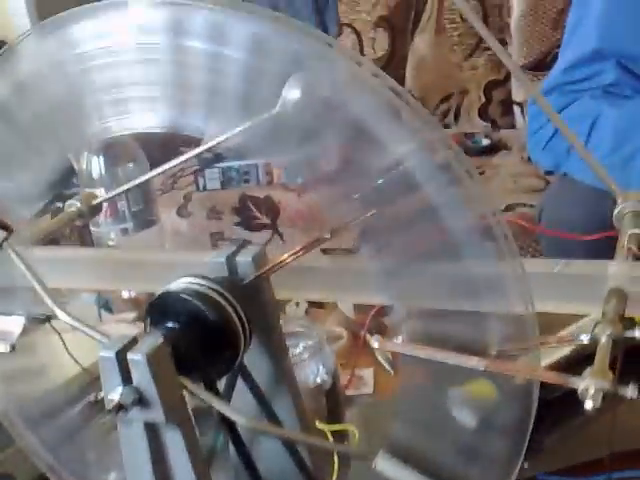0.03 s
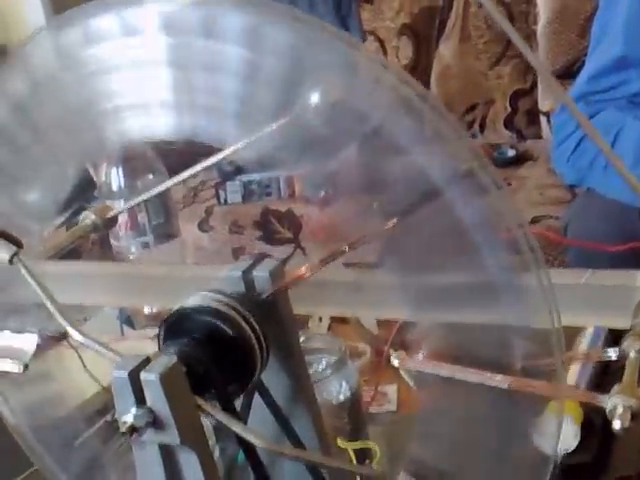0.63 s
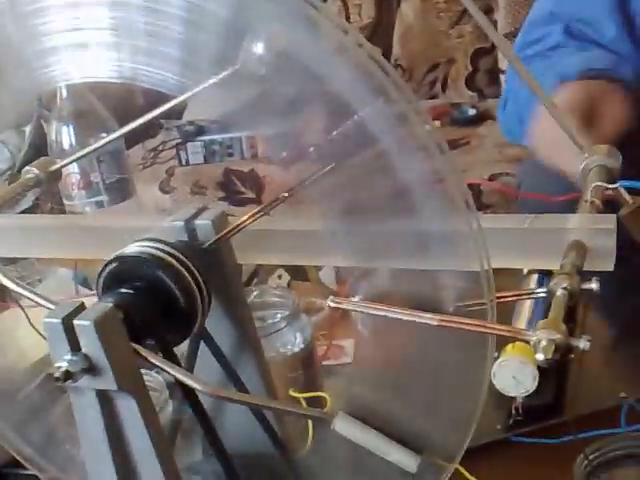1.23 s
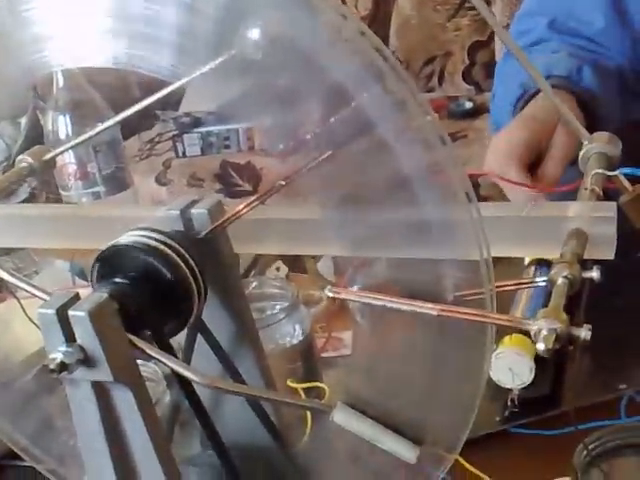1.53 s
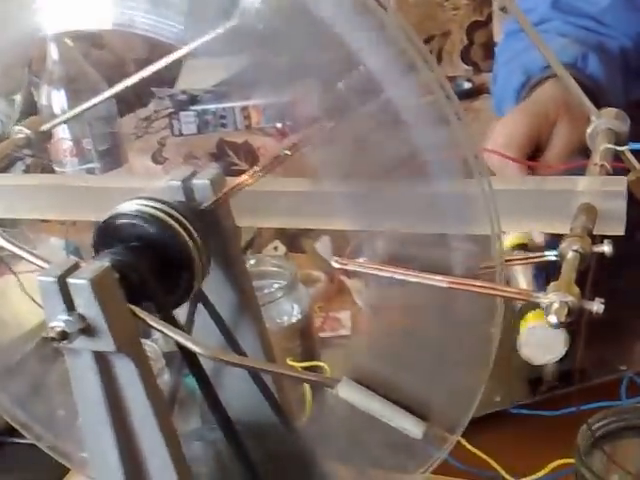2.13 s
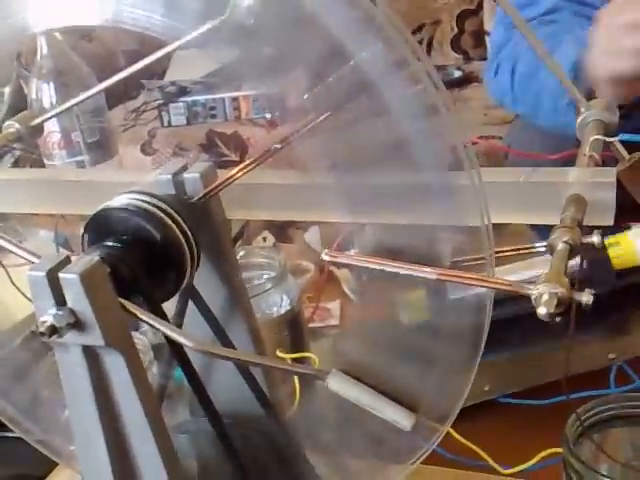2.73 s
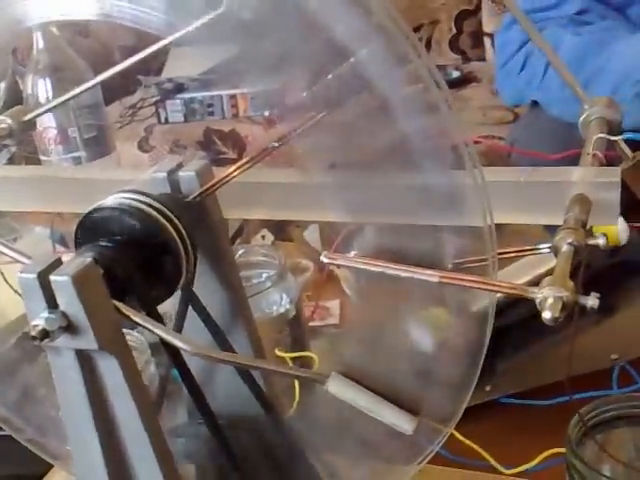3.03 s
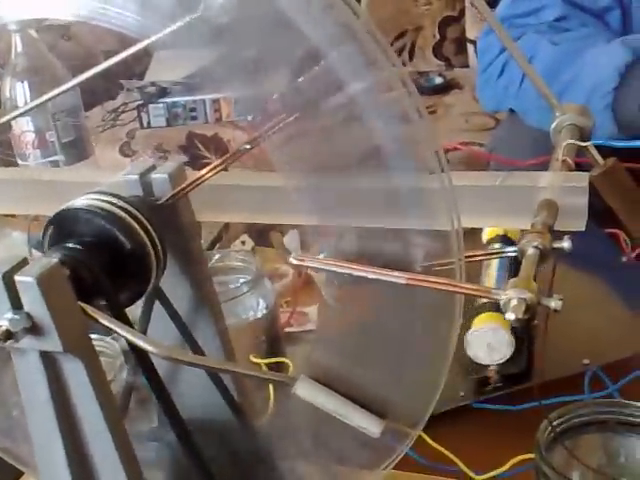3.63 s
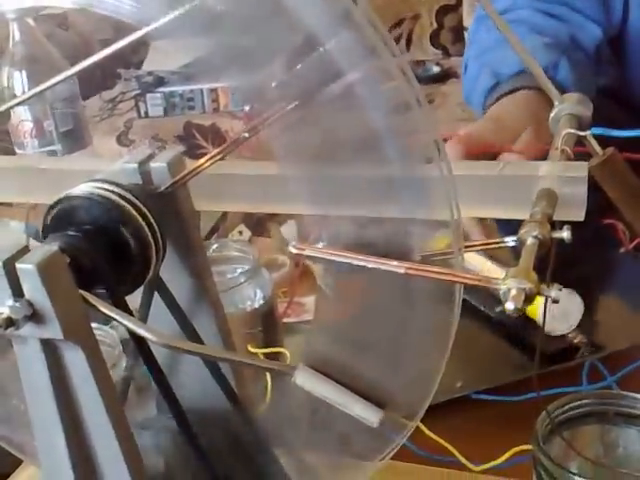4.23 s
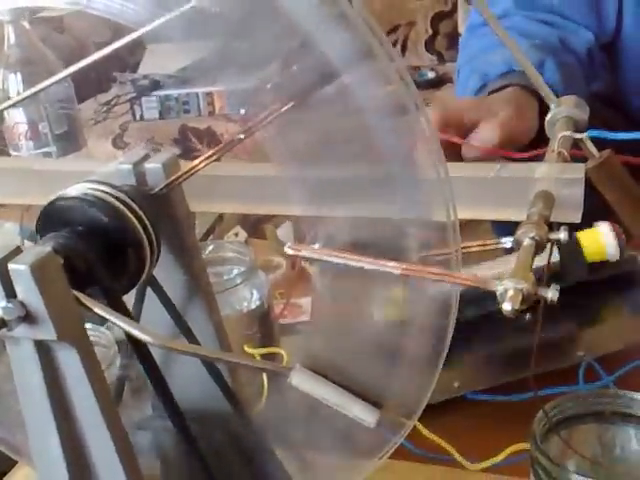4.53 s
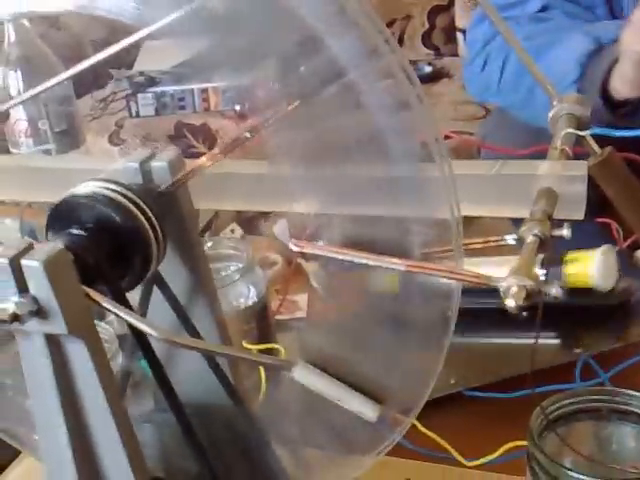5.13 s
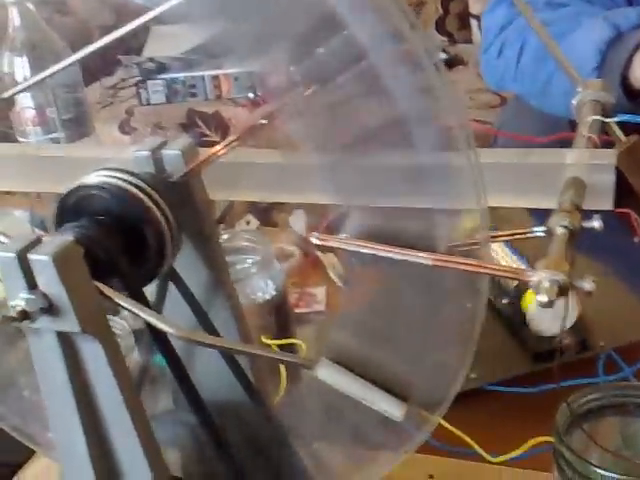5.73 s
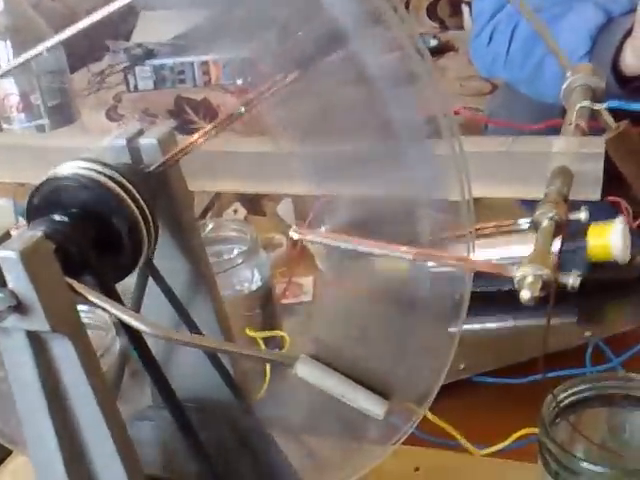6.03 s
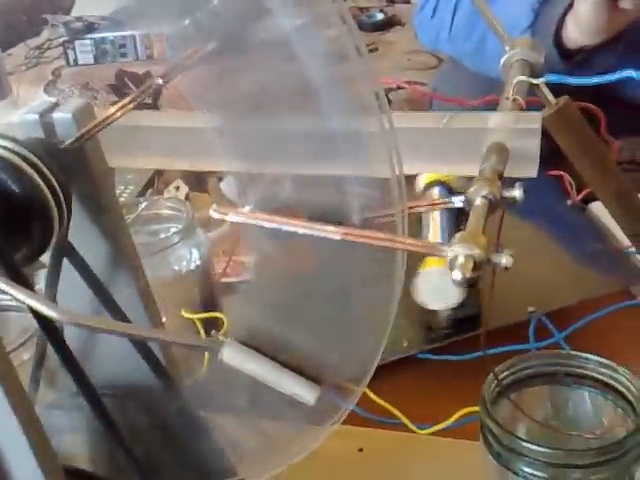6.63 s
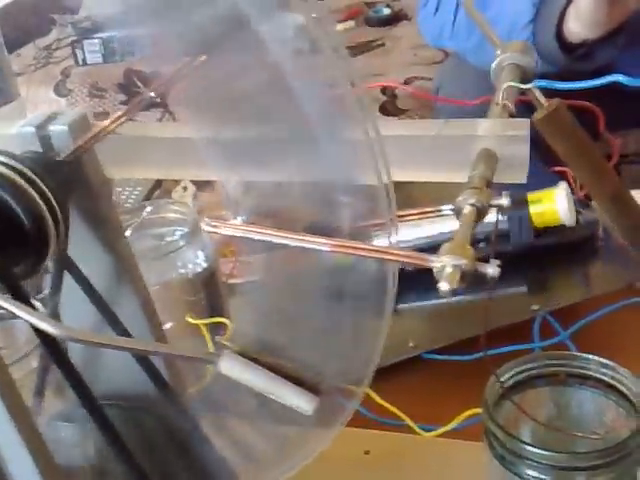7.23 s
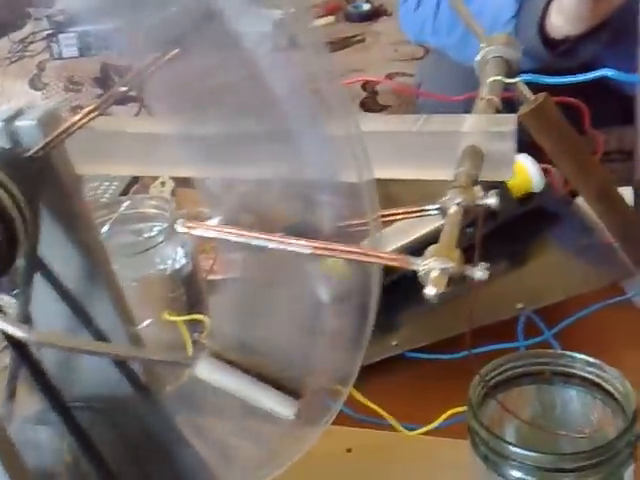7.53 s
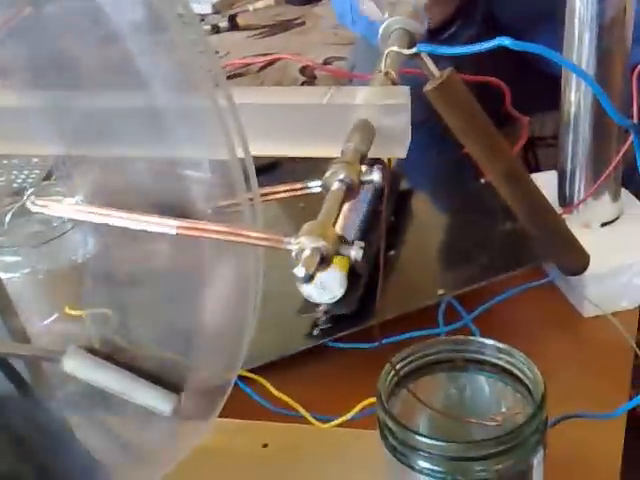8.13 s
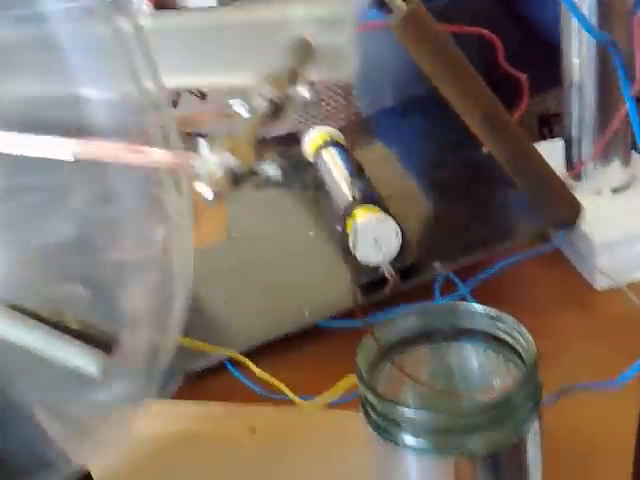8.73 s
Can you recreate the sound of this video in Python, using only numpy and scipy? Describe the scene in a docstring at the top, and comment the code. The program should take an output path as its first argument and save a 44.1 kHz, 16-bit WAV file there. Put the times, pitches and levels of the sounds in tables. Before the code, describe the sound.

A homemade electrostatic machine whirs and hisses steadily up close, its spinning disc rubbing rhythmically amid irregular clunks and clicks.

```python
"""Homemade electrostatic machine, close up

A small room, a hand-held microphone drifting close to the disc as it slowly and unevenly gains speed.
Wire brushes hiss over 24 foil sectors; the disc wobbles and rubs once a turn, shaking stand and table.
Beneath lie motor hum, panel buzz, belt whirr and rumble; now and then the frame shudders.
The loose hub clunks, the stand thuds, a small arm clicks; handling the microphone adds soft bumps."""
import sys
import numpy as np
from scipy import signal
from scipy.fft import rfft, irfft
from scipy.io import wavfile

SR = 44100
rng = np.random.default_rng(int(sys.argv[2]) if len(sys.argv) > 2 else 0)


def file_out(sig):
    """Save sig as 16-bit WAV at sys.argv[1]."""
    # one column per channel
    cols = np.atleast_2d(sig).T
    # limit, then scale
    lim = np.clip(cols, -1, 1)
    pcm = np.round(lim * 32767).astype(np.int16)
    wavfile.write(sys.argv[1], SR, pcm)


N = 391608
TIME = np.arange(N) / SR
FREQ = np.maximum(np.fft.rfftfreq(N, 1 / SR), 1)
SECTOR_COUNT = 24


def undb(db):
    """Decibels to gain."""
    return 10 ** (np.asarray(db) / 20)


def unit(x):
    """Scale to rms 1."""
    return x / np.sqrt(np.mean(x ** 2))


def curves(table):
    """Each column of a time table, sample by sample."""
    seconds, *columns = np.transpose(table)
    return [np.interp(TIME, seconds, column) for column in columns]


def cyclic(phase, table):
    """Gain of a pattern that repeats once a cycle."""
    return undb(np.interp(phase, *np.transpose(table), period=1))


def filtered(x, response):
    """Apply a frequency response."""
    return irfft(rfft(x) * response, N)


def colour(points):
    """Response through (Hz, dB) points."""
    hz, db = np.transpose(points)
    return undb(np.interp(np.log(FREQ), np.log(hz), db))


def resonance(hz, width):
    """Band-pass response, gain 1 at the centre, width in Hz."""
    return 1 / (1 + 1j * (FREQ ** 2 - hz ** 2) / (FREQ * width))


def body(modes):
    """Response of a set of modes, neighbours in opposite phase."""
    return sum((-1) ** k * undb(db) * resonance(hz, width) for k, (hz, width, db) in enumerate(modes))


def noise():
    """White noise."""
    return rng.standard_normal(N)


def wander(hz):
    """Smooth random drift, mostly slower than hz, rms 1."""
    return unit(filtered(noise(), 1 / (1 + (FREQ / hz) ** 4)))


def grains(per_s):
    """Random tiny impacts, rms 1."""
    return unit((rng.random(N) < per_s / SR) * noise())


def add(track, start_s, sound):
    """Mix a sound into a track."""
    start = max(int(start_s * SR), 0)
    track[start:start + len(sound)] += sound[:N - start]


def ring(modes, low_db_per_octave=0, attack_s=0.00043, detune=0.0056):
    """One blow on a set of modes, peak 1; each lands on a slightly different spot, detuning them."""
    hz, t60, db, arrival_ms = np.transpose(modes)[:, :, None]
    t = np.maximum(TIME[:SR // 5] - arrival_ms / 1000, 0)
    hz = hz * (1 + detune * rng.standard_normal(hz.shape))
    gain = undb(db + low_db_per_octave * np.log2(hz.max() / hz))
    envelope = np.exp(-np.log(1000) * t / t60) * (1 - np.exp(-t / attack_s))
    blow = (gain * np.sin(2 * np.pi * hz * t) * envelope).sum(0)
    return blow / np.abs(blow).max()


# A brush crossing one foil. Each row: share of the sector, contact in dB.
FOIL_CONTACT = [(0, 8.5), (.11, 10), (.25, 5.9), (.5, 7.5), (.68, 2.5), (.88, 3)]
# The hiss from close by. Each row: frequency in Hz, level in dB.
HISS_COLOUR = [(1410, -29), (2400, -10), (2660, -11), (3610, -6.5), (4350, -10.5), (5500, -10),
               (7240, -10.5), (9230, -8), (11300, 2.5), (13700, -1), (15600, -9)]
# The upper hiss is beamed, so it shifts as the microphone moves.
# Each row: time in seconds, top band level in dB, middle band level in dB.
HISS_LEVELS = [(0, -24.5, -31.5), (1.5, -23.8, -30.5), (3.2, -22.5, -30), (4.3, -22.5, -29),
               (5.2, -23.5, -30.5), (5.6, -22.9, -29.5), (7.6, -23.5, -28), (8.2, -25, -27.5),
               (8.88, -25.5, -27.5)]


def brushes(sectors):
    """Each foil edge flicks the wire bristles; the scratch dies away until the next edge."""
    index = sectors.astype(int)
    foil_db = 0.37 * rng.standard_normal(SECTOR_COUNT)[index % SECTOR_COUNT]
    chance_db = .5 * noise()[index]
    contact = cyclic(sectors, FOIL_CONTACT) * undb(foil_db + chance_db)
    wire = 1 + 0.19 * resonance(3350, 340) + 0.49 * resonance(7400, 340) + 0.068 * resonance(11800, 400)
    response = colour(HISS_COLOUR) * wire
    above_low, above_middle = (1 / (1 + (hz / FREQ) ** 24) for hz in (6000, 9800))
    soft_scratch = contact ** 0.87 * (noise() + 0.22 * grains(per_s=3000))
    scratch = contact * (noise() + 0.43 * grains(per_s=5000))
    low = filtered(soft_scratch, response * np.sqrt(1 - above_low))
    middle = filtered(scratch, response * above_low * (1 - above_middle))
    top = filtered(scratch, response * above_middle)
    top_db, middle_db = curves(HISS_LEVELS)
    return unit(low) * undb(-34) + unit(middle) * undb(middle_db) + unit(top) * undb(top_db)


# The microphone's path past the disc. Each row: time in seconds, delay of the disc's reflection in ms,
# gain of that reflection, gain of the brush holder's ring.
MICROPHONE_PATH = [(0, 1.345, .12, .1), (2, 1.355, .15, 0), (3.3, 1.365, .19, 0), (5.2, 1.37, .17, .05),
                   (6, 1.38, .2, .2), (7, 1.402, .25, .45), (8, 1.398, .24, .6), (8.5, 1.38, .17, .45),
                   (8.88, 1.34, .1, .1)]


def microphone_drift(hiss):
    """As the microphone moves, the holder's ring comes and goes and the disc's echo combs the hiss."""
    delay_ms, reflection_gain, holder_gain = curves(MICROPHONE_PATH)
    holder = filtered(hiss, 1.1 * resonance(6210, 170) + 0.9 * resonance(8900, 260))
    direct = hiss + holder_gain * holder
    return direct + reflection_gain * np.interp(TIME - delay_ms / 1000, TIME, direct)


# One turn of the wobbling disc. Each row: share of the turn, rubbing pressure in dB.
TURN_PRESSURE = [(0, 0), (.08, -5.5), (.18, -13), (.27, -8.5), (.35, -14), (.53, -11), (.68, -13),
                 (.79, -9), (.855, .5), (.915, 2.5)]


def wobble(sectors, imbalance, lag_turns=0):
    """Pressure that peaks once a turn, more sharply with more imbalance."""
    return cyclic(sectors / SECTOR_COUNT - lag_turns, TURN_PRESSURE) ** imbalance


# The rubbed disc's modes. Each row: frequency in Hz, width in Hz, level in dB.
DISC_MODES = [(1396.5, 30, 8.5), (1498, 23, 5.5), (1678, 64, -4.5), (1890, 160, -3), (2033, 120, -3.5),
              (2500, 69, -7)]
# How hard the disc rubs. Each row: time in seconds, gain in dB.
RUB_LEVELS = [(0, -42.5), (1.3, -41), (4.2, -38.2), (4.6, -40), (5.3, -39.2), (5.8, -36.5), (7.5, -37),
              (8.1, -40), (8.88, -40.4)]


def disc_rub(sectors, imbalance):
    """Once a turn the disc rubs and chatters, ringing its own modes."""
    pressure = imbalance ** .5 * wobble(sectors, imbalance) * undb(1.2 * wander(hz=27))
    friction = pressure * (noise() + 0.9 * grains(per_s=280))
    low_cut = 1 / (1 + (1250 / FREQ) ** 12)
    rub_db, = curves(RUB_LEVELS)
    return unit(filtered(friction, body(DISC_MODES) * low_cut)) * undb(rub_db)


# Spells of shuddering in the frame. Each row: start in seconds, length in seconds, strength in dB.
SHUDDER_SPELLS = [(0, 1.12, -3.5), (1.655, 0.17, -2), (2.1, 0.09, -1), (2.39, 0.25, -0.5),
                  (3.383, 0.071, -5), (3.97, .08, -5), (5.59, .22, -1), (6.21, .26, 1), (8.36, .25, -9)]


def frame_shudder(attack_s=0.043, release_s=0.039):
    """How hard the frame shudders: each spell builds up to its start, holds and dies away."""
    shudder = np.zeros(N)
    for start, length, db in SHUDDER_SPELLS:
        rise = np.minimum(TIME - start, 0) / attack_s
        fall = np.maximum(TIME - start - length, 0) / release_s
        shudder += undb(db) * np.exp(rise - fall)
    return shudder


# The stand's modes, shaken or struck. Each row: frequency in Hz, width in Hz, level in dB.
STAND_MODES = [(347, 60, -8.5), (502, 41, -1.5), (603, 108, -6.5), (754.7, 26.3, 6), (833, 77, -7),
               (936, 81, -2), (1024, 11, -11)]


def stand_shake(sectors, imbalance, shudder):
    """The stand rings just after each rub, a little louder in a shudder."""
    sway = wobble(sectors, imbalance, lag_turns=0.05) ** .65 * undb(1.1 * wander(hz=12))
    shaking = sway * (noise() + 0.72 * grains(per_s=180))
    return unit(filtered(shaking, body(STAND_MODES))) * undb(-44.5 + shudder)


def table_drone(sectors, sector_hz, imbalance, shudder, note_hz=152.5, reach_hz=15.6):
    """The table throbs after each rub, most strongly with the sector rate near its own note."""
    roughness = unit(filtered(noise(), resonance(note_hz, 69)))
    push = np.sin(2 * np.pi * sectors) + 0.91 * roughness
    rocking = wobble(sectors, imbalance, lag_turns=0.15)
    drone = filtered(rocking * push, resonance(note_hz, 55) ** 2)
    off_note = 1 - np.exp(-((sector_hz - note_hz) / reach_hz) ** 2)
    return unit(drone) * undb(-50.5 + 2.5 * shudder - 6.5 * off_note)


def motor_hum(shudder, motor_hz=60.1):
    """A wavering hum, mostly second harmonic, that the frame passes on when it shudders."""
    phase = 2 * np.pi * motor_hz * TIME + .7 * wander(hz=7.7)
    hum = np.sin(2 * phase) + undb(-23) * np.sin(phase)
    gain = undb(-62) + undb(-45.5) * shudder
    return hum * gain * undb(1.7 * wander(hz=7.8))


# The machine's panels. Each row: frequency in Hz, width in Hz, level in dB.
PANEL_MODES = [(130.8, 7.3, 4.5), (192, 71, -11.5), (512, 21, -3.5), (776, 30, 3)]


def panel_buzz(sectors):
    """The panels buzz as harmonics of the sector rate cross their resonances."""
    pulses = sum(np.sin(2 * np.pi * k * sectors) for k in range(1, 8))
    uneven_pulses = pulses * undb(2.7 * wander(hz=13))
    return unit(filtered(uneven_pulses, body(PANEL_MODES))) * undb(-50.5)


# The whirr beside the machine. Each row: frequency in Hz, level in dB.
WHIRR_COLOUR = [(15, -49), (25, -17), (75, -11.5), (153, -8.5), (231, -8), (499, -7), (602, -11), (757, -6),
                (1080, -6.5), (1270, -2.5), (1410, 2), (1600, 0.5), (3600, -6), (4680, -31), (7920, -120)]


def belt_whirr():
    """Belt and stirred air make a grainy, fluttering rush."""
    rush = filtered(noise() + .5 * grains(per_s=930), colour(WHIRR_COLOUR))
    return unit(rush) * undb(-37.5 + 2 * wander(hz=42))


def rumble(shudder):
    """A faint, wandering rumble that rises when the frame shudders."""
    level_db = -62.5 + 2 * shudder + 3 * wander(hz=6.8)
    return unit(filtered(noise(), resonance(65, 170) ** 2)) * undb(level_db)


# Modes of hub and axle. Each row: frequency in Hz, seconds to fall 60 dB, level in dB, arrival in ms.
HUB_MODES = [(523, 0.038, -10.5, 0.37), (1367, 0.05, -4.5, 0), (1538, 0.06, -9, 0.87),
             (1883, 0.083, -7, 0.52), (2122, 0.022, 7.5, 0.62)]
AXLE_MODES = [(977, 0.084, -3, 0.69), (1052, 0.18, -11.5, 0.82)]
# Clunks at the hub. Each row: start in seconds, level in dB, axle ring and rebound in dB
# relative to that level, rebound delay in ms.
HUB_CLUNKS = [(0.04, -17, -8.5, -4, 18), (.964, -23, -5.5, -8, 12), (1.673, -19.5, -16.5, -7, 4.4),
              (2.326, -20.5, -19, -6, 6.3), (2.681, -16.5, -10.5, -13, 6.6), (3.458, -21.5, -7, -12, 9),
              (4.191, -13.5, -12, -13, 9), (5.68, -25, -9, -1, 9.5), (5.829, -17, -16, -2, 26),
              (6.473, -14, -14, -5, 14), (7.128, -22, -12, -10, 8), (7.157, -14.5, -11, 1.5, 16),
              (7.85, -10.5, -19, -15, 10), (8.501, -10, -14.5, -4.5, 11.4)]


def hub_clunks():
    """The loose hub knocks, rings the axle and rebounds with a duller knock."""
    track = np.zeros(N)
    for start, db, axle_db, rebound_db, rebound_ms in HUB_CLUNKS:
        add(track, start, undb(db) * ring(HUB_MODES, attack_s=0.00094, detune=0.023))
        add(track, start, undb(db + axle_db) * ring(AXLE_MODES, attack_s=0.0017))
        rebound = ring(HUB_MODES, low_db_per_octave=4.5, attack_s=0.0014, detune=0.022)
        add(track, start + rebound_ms / 1000, undb(db + rebound_db) * rebound)
    return track


# Thuds in the stand. Each row: start in seconds, peak level in dB.
STAND_THUDS = [(0.061, -28), (0.971, -27), (1.812, -31), (2.333, -20.5), (3.454, -28), (4.182, -24),
               (5.69, -26), (5.775, -21.5), (6.519, -23.5), (7.16, -27), (7.57, -28), (7.882, -30),
               (8.54, -22)]


def stand_thuds():
    """Single blows ring the stand's modes dully."""
    blows = np.zeros(N)
    for start, db in STAND_THUDS:
        add(blows, start, undb([db]))
    response = body(STAND_MODES)
    peak = np.abs(irfft(response)).max()
    return filtered(blows, response / peak)


# The arm's modes. Each row: frequency in Hz, seconds to fall 60 dB, level in dB, arrival in ms.
ARM_MODES = [(2820, 0.0092, 4.5, -0.5), (2410, 0.014, 2.5, 2.9), (2015, 0.022, 0, -0.5),
             (1496, 0.024, 2, 4), (1490, 0.022, -9, 3), (504, 0.039, -18, 2.5)]
# Clicks of the arm. Each row: start in seconds, level in dB, lift of the low modes in dB per octave.
ARM_CLICKS = [(0.3177, -18, 3.5), (2.0118, -24, 6), (2.0853, -22, 5), (2.6165, -25, -3),
              (2.9248, -18.5, -1), (4.626, -17.5, 0), (4.873, -11.5, 2), (5.1092, -12, 1.5),
              (5.7535, -18, -10), (5.934, -14.5, 2.5), (6.5148, -18, -15), (7.435, -19.5, 7.5),
              (8.089, -12, 1.5), (8.8283, -22.5, 1)]


def arm_clicks():
    """A small swinging arm strikes its mount and rings briefly."""
    track = np.zeros(N)
    for start, db, lift in ARM_CLICKS:
        add(track, start, undb(db) * ring(ARM_MODES, low_db_per_octave=lift))
    return track


# Handling bumps at the microphone. Each row: centre in seconds, level in dB, pitch in Hz.
HANDLING_BUMPS = [(1.9, -53, 65), (2.53, -56, 70), (3.47, -56, 60), (4.56, -49, 29), (5.82, -49, 70),
                  (6.53, -51, 65), (8.36, -55, 60), (8.57, -45.5, 70)]


def handling_bumps(swell_s=0.072):
    """Handling the microphone makes short, soft swells of low rumble."""
    track = np.zeros(N)
    for centre, db, hz in HANDLING_BUMPS:
        swell = np.exp(-((TIME - centre) / swell_s) ** 2)
        track += unit(filtered(noise(), resonance(hz, width=70) ** 2)) * undb(db) * swell
    return track


def room(direct, t60_s, wet_db):
    """The small furnished room adds a short diffuse tail behind the close sound."""
    t = TIME[:SR // 2]
    tail = rng.standard_normal(len(t)) * np.exp(-np.log(1000) * t / t60_s) * (t > .005)
    return direct + undb(wet_db) * signal.fftconvolve(direct, tail / np.linalg.norm(tail))[:N]


# The disc's speed. Each row: time in seconds, sectors passing a brush per second.
DISC_SPEED = [(0.0, 125.83), (0.76, 133.9), (1.02, 132.46), (1.66, 141.19), (2.24, 141.05), (3.24, 155.28),
              (3.54, 156.17), (4.4, 168.04), (4.78, 160.09), (5.0, 150.73), (5.24, 149.21), (5.62, 156.05),
              (6.04, 155.12), (6.96, 169.03), (7.98, 182.76), (8.16, 182.71), (8.88, 192.67)]


def scene():
    """The machine at one close microphone; the disc's angle times hiss, rub, drone and buzz together."""
    sector_hz, = curves(DISC_SPEED)
    sectors = np.cumsum(sector_hz) / SR  # sectors passed so far
    imbalance = np.minimum(sector_hz / 155, 1.1) ** 2  # bites harder as the disc speeds up
    shudder = frame_shudder()
    hiss = microphone_drift(brushes(sectors))
    rubbing = disc_rub(sectors, imbalance) + stand_shake(sectors, imbalance, shudder)
    drone = table_drone(sectors, sector_hz, imbalance, shudder)
    drive = motor_hum(shudder) + panel_buzz(sectors) + belt_whirr() + rumble(shudder)
    bumps = handling_bumps()
    knocks = room(hub_clunks() + stand_thuds() + arm_clicks(), t60_s=.2, wet_db=-12)
    return (hiss + rubbing + drone + drive + bumps + knocks)[None]


def record(dry):
    """The hand-held recorder cuts the top steeply."""
    top_hz = 15680
    return signal.sosfilt(signal.ellip(12, .1, 90, top_hz, fs=SR, output="sos"), dry)


dry = scene()
out = record(dry)
file_out(out)
```